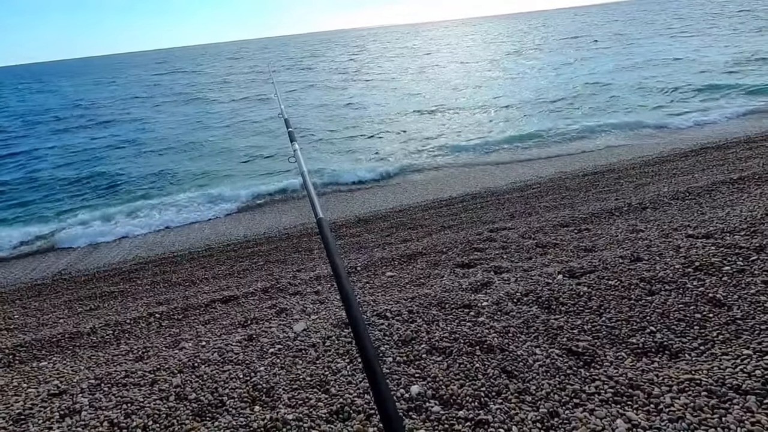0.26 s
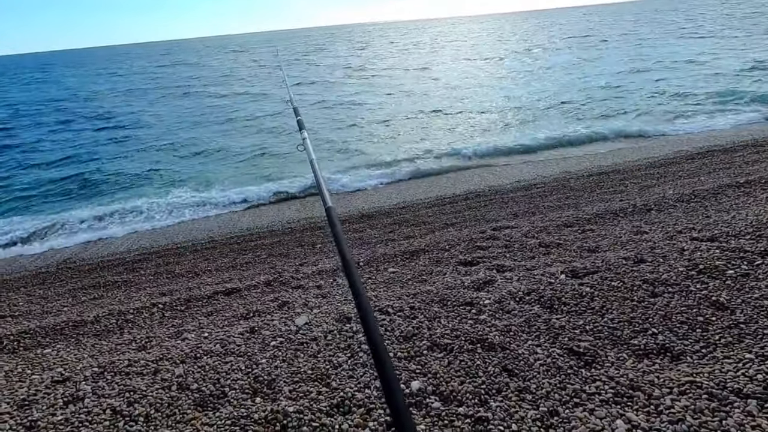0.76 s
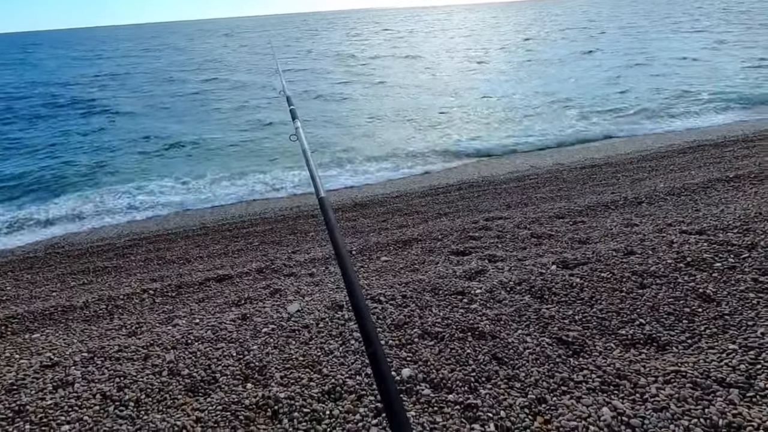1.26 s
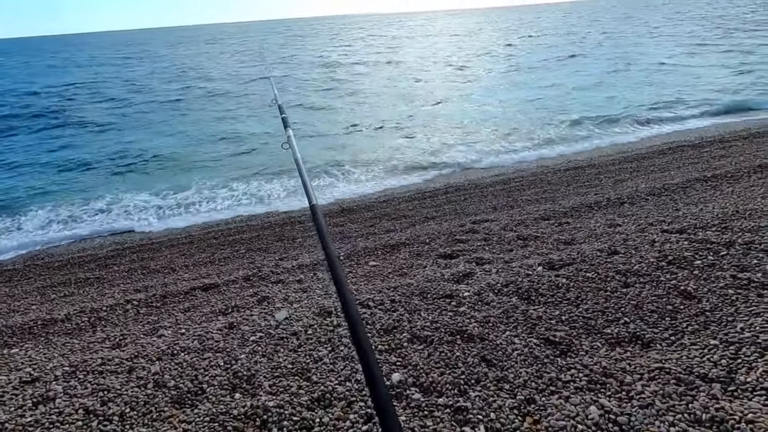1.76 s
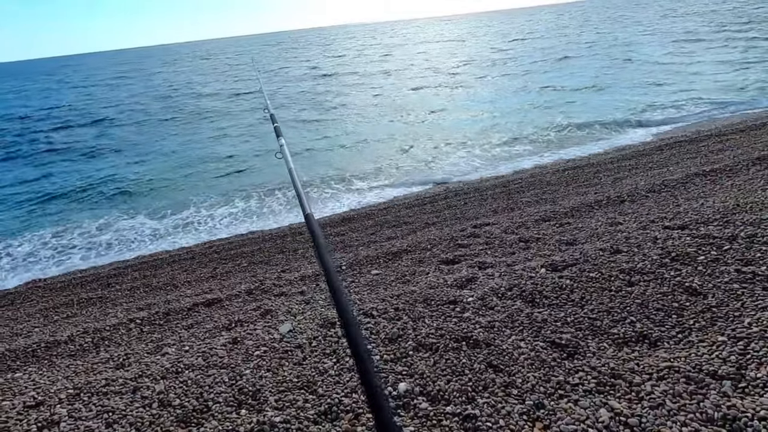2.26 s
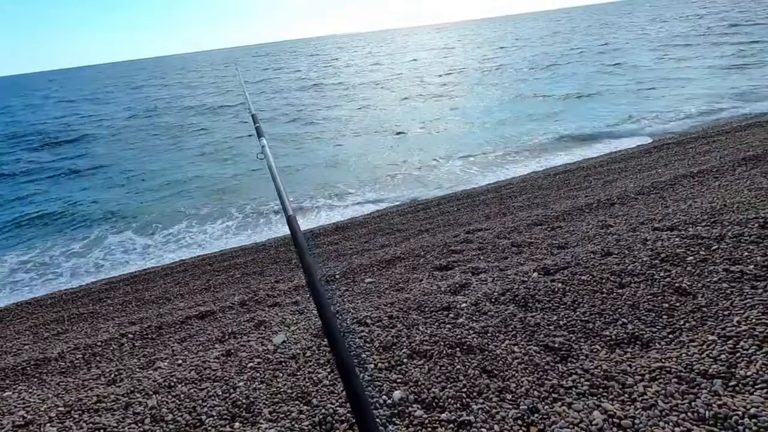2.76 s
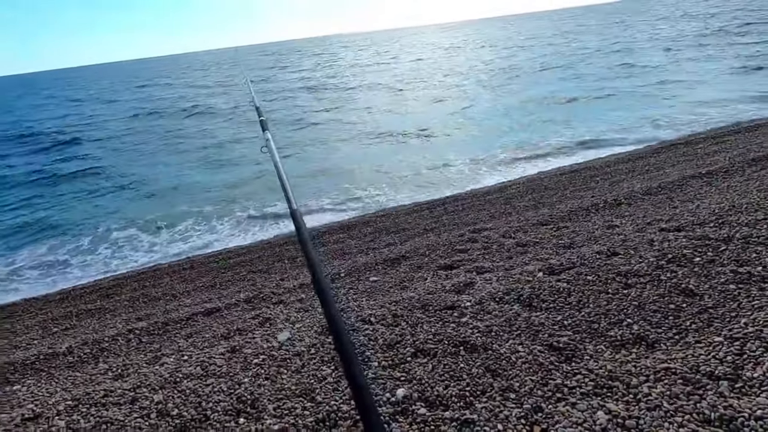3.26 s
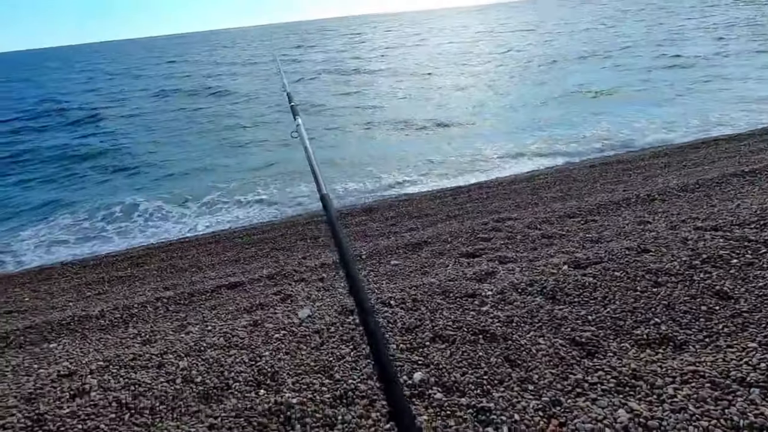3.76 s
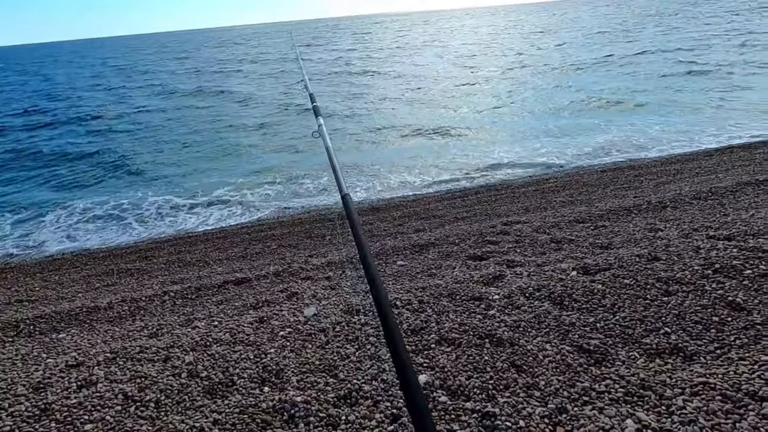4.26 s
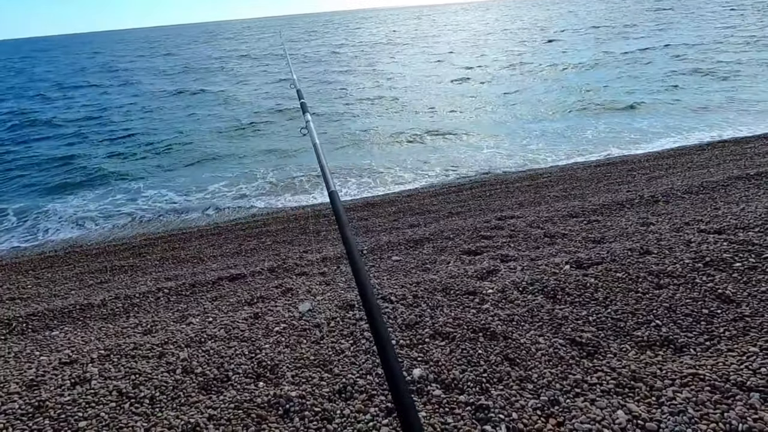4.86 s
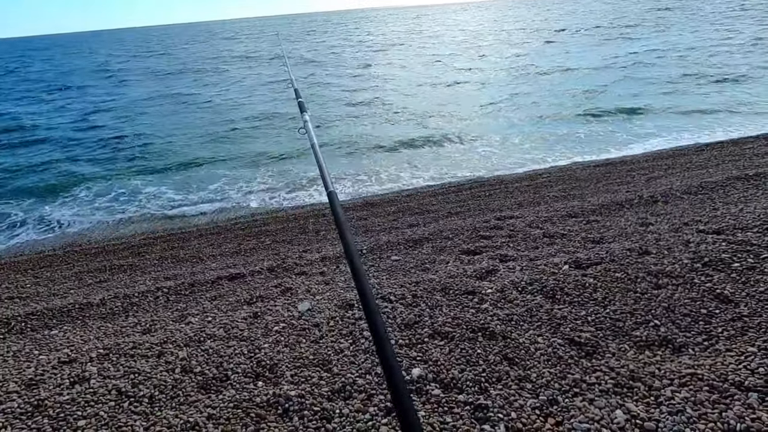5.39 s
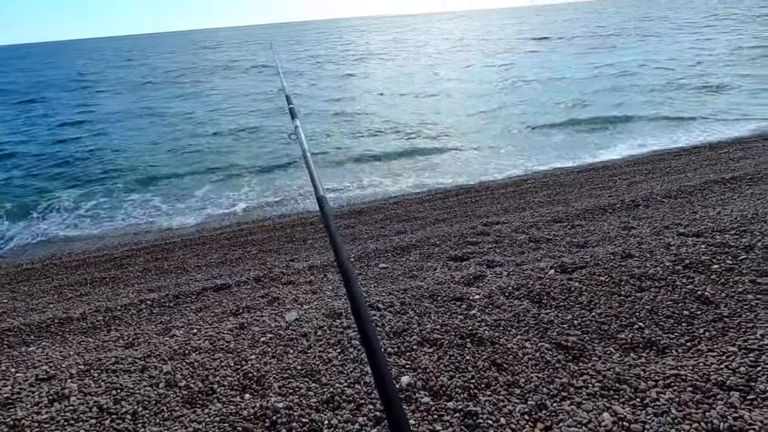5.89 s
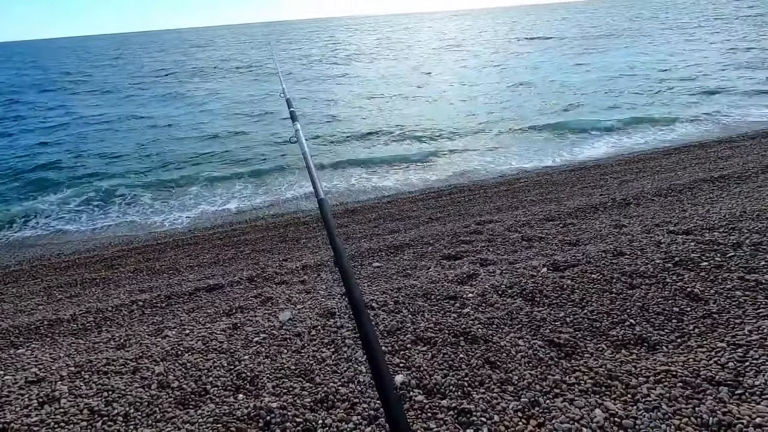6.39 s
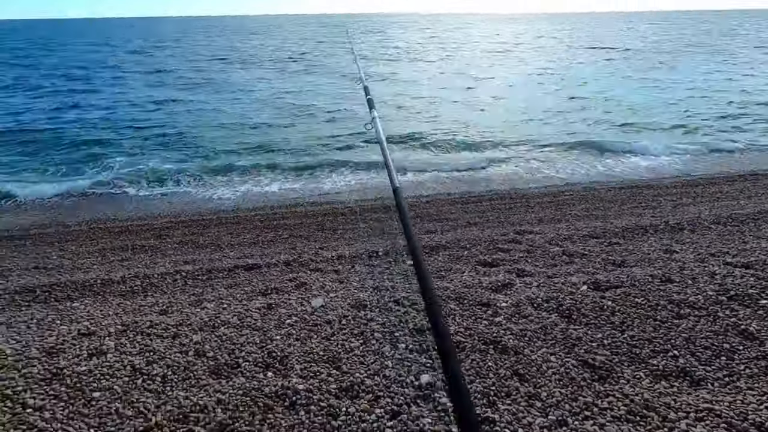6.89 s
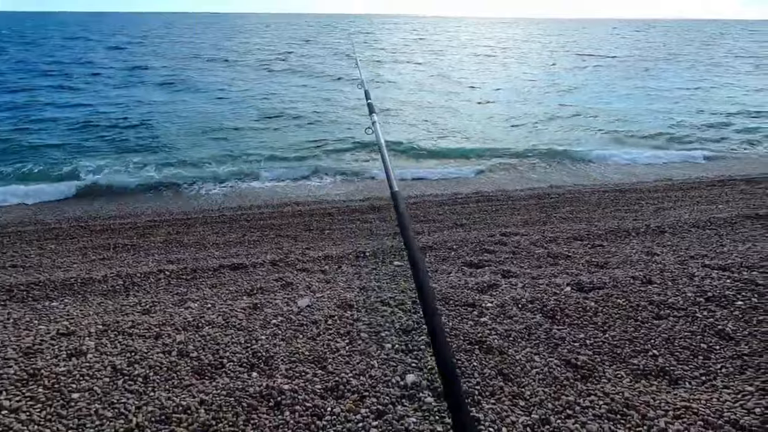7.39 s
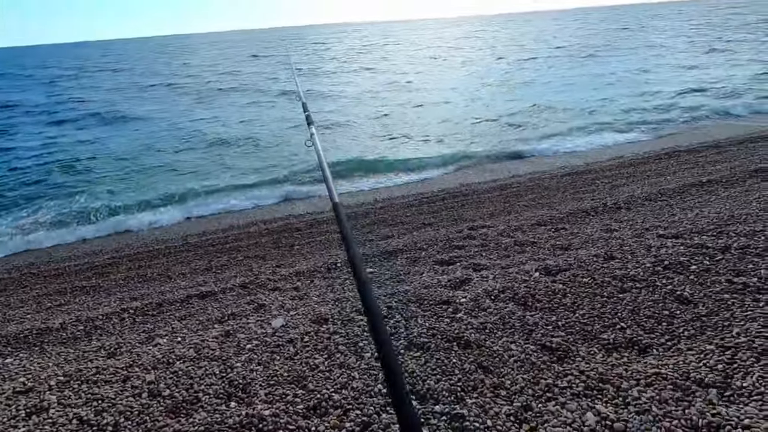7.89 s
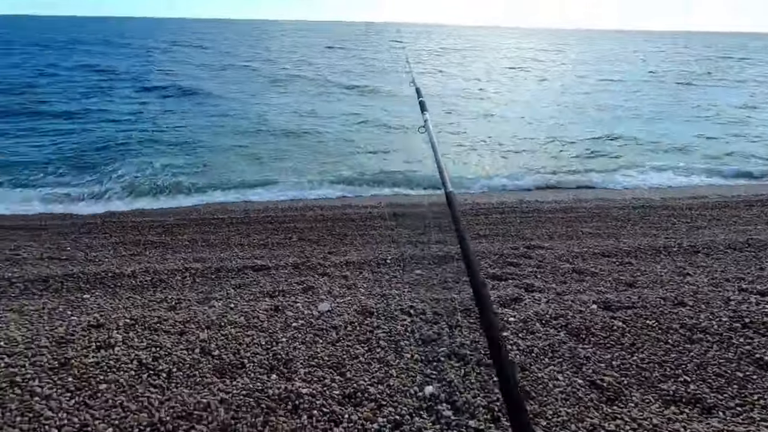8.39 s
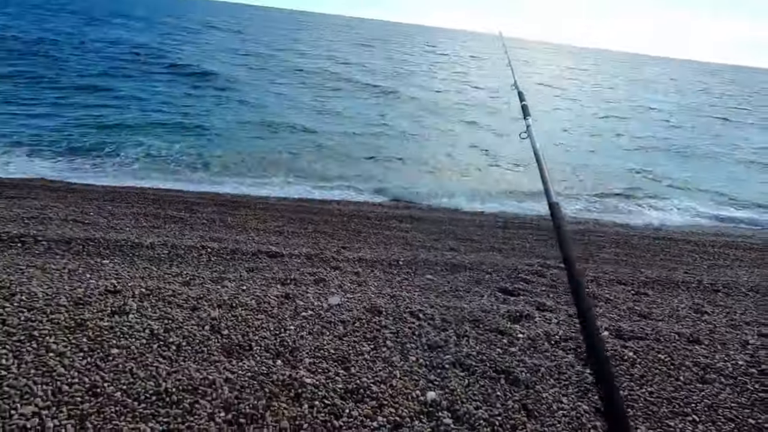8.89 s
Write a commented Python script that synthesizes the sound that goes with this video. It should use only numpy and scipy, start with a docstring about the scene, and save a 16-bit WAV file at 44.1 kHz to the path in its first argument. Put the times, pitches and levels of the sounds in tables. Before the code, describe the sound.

A windy pebble beach heard from a few metres up the bank. From 0 to about 1.8 s a small wave breaks, a smooth low roar under seething foam, bright fizz and dense clattering stones, with a fresh surge near 1.2 s. It thins by 2 s into a quieter wash until about 4.2 s. In this lull single pebbles tick nearby, with small scrapes of grit around 2.6, 3.3 and 3.6 s and the sharpest click near 3.8 s; fainter ticks continue to 5.4 s. From 4.3 s foam and dragged shingle grow, rattling strongly around 5.5 s and staying gravelly through 7 s. Another wave builds, breaking fullest near 8.2 s, then the stones ease until the end at 9.1 s. Low wind rumble and flutter buffet the microphone throughout, with thumping puffs around 1.4, 2.4 and 4.6 to 4.9 s, and abrupt strong ones at the very end.

```python
"""Small waves on a pebble beach, heard from a few metres up the bank on a windy day.
Breakers roar and foam seethes in filtered noise; the backwash drags stones that clatter as dense random impacts.
Nearer stones clink as short resonances, spray and mist fizz on top, and pebbles nearby tick or slide.
Wind buffets the microphone port with low noise that gusts hurry along, with flutter and sharp puffs."""
import sys
import numpy as np
from scipy import signal
from scipy.fft import rfft, irfft, next_fast_len
from scipy.io import wavfile
from scipy.ndimage import uniform_filter1d, map_coordinates

SR = 44100
rng = np.random.default_rng(int(sys.argv[2]) if len(sys.argv) > 2 else 0)


def materialize(psi):
    """Save the field psi as 16-bit PCM at rate SR to the path in sys.argv[1].

    A 1-D psi becomes a single channel; in a 2-D psi each row is a channel.
    """
    bounded = np.clip(np.atleast_2d(psi).T, -1, 1)
    quanta = np.round(bounded * 32767).astype(np.int16)
    wavfile.write(sys.argv[1], SR, quanta)


N = 403074   # length in samples

# Layer levels in the tables hold ahead of the echo and record(); colours give only the shape of a spectrum.


def sea():
    """Mixes the wash: one surge of water moves stones of every size; the large stones are the steadiest."""
    # waves breaking and running up: t/s, breaker level/dB, foam level/dB, mist level/dB
    surf = [(0.0, -33, -30, -63), (.6, -31.5, -29.5, -59.5), (1.07, -33, -33, -65),
            (1.2, -28.5, -29.5, -59.5), (1.55, -32.5, -28.5, -62), (1.88, -33.5, -31, -68),
            (2.15, -36, -36, -69), (2.65, -40.5, -40.5, -73), (2.95, -36, -36, -71),
            (3.35, -37.5, -36.5, -70), (3.66, -42.5, -40.5, -71), (3.95, -38, -37, -71),
            (4.35, -41.5, -33.5, -72), (4.9, -43.5, -30.5, -69.5), (5.5, -38, -33, -69),
            (6.2, -39.5, -44, -71), (6.5, -40, -37, -68), (6.85, -35, -31, -65.5),
            (7.75, -33.5, -30, -61.5), (8.24, -29.5, -29.5, -60.5), (9.14, -32, -33.5, -66)]
    # water drawing back through the shingle: t/s, dragged stones level/dB,
    # then gravel, grit and spray, each level/dB above the stones
    backwash = [(0.0, -28, -5, -12.5, -27), (.3, -28, -7, -11.5, -28), (1.0, -34, -7, -11.5, -29),
                (1.2, -31.5, -9, -11, -27), (1.85, -34, -6.5, -12.5, -26.5), (2.1, -40.5, -3, -8.5, -20.5),
                (3.0, -38.5, -8, -19, -21.5), (3.5, -40.5, -4, -10.5, -21.5), (4.0, -40, -4.5, -9.5, -23),
                (4.25, -37, -7.5, -13.5, -26), (4.45, -34.5, -8, -12, -28), (4.6, -34.5, -8.5, -7.5, -27),
                (4.9, -31, -6, -11.5, -25.5), (5.46, -27, -7.5, -14, -26.5), (6.1, -30.5, -3, -12, -20),
                (6.45, -29, -4, -12, -20.5), (6.8, -30, -3, -14, -19), (7.4, -28, -6.5, -14.5, -25),
                (8.1, -29, -6.5, -15, -26), (8.8, -36, -8.5, -12.5, -26), (9.14, -36, -8.5, -13.5, -21)]
    # passing bands of fizz: peak t/s, length/s, level/dB, centre f/Hz, half-width/octaves
    fizz = [(.25, 0.62, -43, 1950, 0.13), (.2, .5, -47, 3560, .35), (3.22, 0.99, -46, 1480, 0.38),
            (5.97, 1.9, -44, 4170, 0.098), (7.8, 1.1, -43.5, 2000, 0.094)]
    clink_db = -11   # above the dragged stones

    breaker_db, foam_db, mist_db = in_time(surf)
    stones_db, *above_db = in_time(backwash)
    gravel_db, grit_db, spray_db = stones_db + np.array(above_db)

    clatter = grains(per_s=2000, spread_db=3.5, blur=3.1)
    droplets = grains(per_s=1300, spread_db=3.5, blur=3.4)
    surge, splash = drift(3.7), drift(24)

    run_up = from_db(breaker_db) * breaker() + from_db(foam_db) * foam()
    run_up += from_db(mist_db) * mist(droplets, surge, splash)
    drag = from_db(stones_db) * stones(clatter, surge, splash)
    drag += from_db(stones_db + clink_db) * clinks()
    drag += from_db(gravel_db) * gravel(surge, splash)
    drag += from_db(grit_db) * grit(clatter, surge, splash)
    drag += from_db(spray_db) * spray(droplets, surge, splash)
    return run_up + drag + swells(fizz, clatter)


def breaker():
    """The far roar of breaking water: smooth low noise that hardly wavers."""
    # f/Hz, level/dB per Hz
    breaker_colour = [(150, -10), (250, 1), (400, 3.5), (560, 1), (800, -5), (1600, -57), (2050, -21),
                      (2300, -40), (3000, -28)]
    roar = rng.standard_normal(N) * from_db(0.29 * drift(9.5))
    return rms_one(colour(roar, breaker_colour))


def foam():
    """Bursting bubbles; smaller ones shift the whole band up."""
    # at a pitch of 1000 Hz: f/Hz, level/dB per Hz
    foam_colour = [(450, -13.5), (700, -3), (850, 0.5), (1000, 0.5), (1250, -3), (1700, -11), (3000, -39)]
    # pitch of the foam: t/s, f/Hz
    foam_pitch = [(0, 1150), (.6, 1200), (1.1, 976), (1.9, 954), (2.6, 994), (3.2, 940), (3.7, 990),
                  (4.3, 1115), (4.9, 1310), (5.5, 1275), (6.2, 1250), (6.85, 1120), (7.5, 1150),
                  (8.2, 1094), (9.14, 1030)]
    seethe = colour(grains(per_s=1200, spread_db=3.0, blur=1.72), foam_colour)
    pitch_hz, = in_time(foam_pitch)
    return carried(seethe, pitch_hz / 1000)


def stones(clatter, surge, splash):
    """Dragged stones clatter densely, swelling a little with the water."""
    # f/Hz, level/dB per Hz
    stone_colour = [(800, -18), (1300, 0), (1650, 0), (2080, 2), (2250, -2.5), (2800, -3.5), (3300, -8),
                    (4500, -27)]
    return rms_one(colour(clatter * from_db(0.17 * surge + 0.12 * splash), stone_colour))


def clinks():
    """Nearer stones knock together; each knock rings briefly at one of 24 pitches."""
    clinks_per_s, ring_cycles = 500, 33   # a ring falls by 60 dB in this many cycles
    knocks = grains(per_s=clinks_per_s, spread_db=3.0, blur=1e-9)
    dealt = rng.integers(0, 24, N)   # which pitch a knock excites
    ringing = 0
    for k, hz in enumerate(np.geomspace(900, 4300, num=24)):
        r = from_db(-60 * hz / (ring_cycles * SR))
        w = 2 * np.pi * hz / SR
        struck = knocks * (dealt == k) + 1e-18
        ringing = ringing + signal.lfilter([0, np.sin(w)], [1, -2 * r * np.cos(w), r * r], struck)
    # distance dulls the contact
    dull = signal.butter(3, 4400, fs=SR, output="sos")
    return rms_one(signal.sosfilt(dull, ringing))


def gravel(surge, splash):
    """Smaller stones rattle, at a pitch that shifts with time."""
    # at a pitch of 3800 Hz: f/Hz, level/dB per Hz
    gravel_colour = [(2200, 0.5), (3200, 0), (3900, 0.5), (4400, -2), (5000, -10), (6500, -25)]
    # pitch of the rattle: t/s, f/Hz
    gravel_pitch = [(0, 3800), (2.0, 3797), (3.5, 3800), (4.5, 3903), (5.5, 3852), (6.5, 3751), (7.5, 3550),
                    (8.5, 3601), (9.14, 3708)]
    impacts = grains(per_s=1800, spread_db=4.0, blur=2.1)
    rattle = colour(impacts * from_db(0.5 * surge + 0.5 * splash), gravel_colour)
    pitch_hz, = in_time(gravel_pitch)
    return carried(rattle, pitch_hz / 3800)


def grit(clatter, surge, splash):
    """The finest stones hiss under the same impacts as the dragged stones, less evenly."""
    # f/Hz, level/dB per Hz
    grit_colour = [(3500, -8.5), (4900, 1.5), (6000, -3), (6800, -8), (7300, -13.5), (9000, -47)]
    return rms_one(colour(clatter * from_db(0.31 * surge + 0.6 * splash), grit_colour))


def spray(droplets, surge, splash):
    """Falling droplets fizz as dense tiny impacts."""
    # f/Hz, level/dB per Hz
    spray_colour = [(5500, -3), (7200, -2), (8700, -8.5), (9500, -17), (12000, -50)]
    return rms_one(colour(droplets * from_db(0.31 * surge + 0.45 * splash), spray_colour))


def mist(droplets, surge, splash):
    """The same droplets in the highest band, with an extra flicker of level."""
    # f/Hz, level/dB per Hz
    mist_colour = [(7500, -11.5), (9600, -4.5), (11200, -7), (11900, -13.5), (13300, -17), (14500, -26),
                   (16000, -34)]
    flicker_db = .4 * surge + 0.77 * splash + .5 * drift(12)
    return rms_one(colour(droplets * from_db(flicker_db), mist_colour))


def bank(x):
    """A short echo off the slope of stones hollows the sound."""
    # echo, shifting as the microphone turns: t/s, share of the direct sound, delay/ms
    echo = [(0, 0.16, 1.04), (1.0, 0.13, 0.99), (1.2, .27, 1.06), (1.9, 0.13, 0.96), (2.3, 0.11, 0.95),
            (3.2, .05, 1.01), (4.5, .04, 1.02), (6.0, 0.042, 1.14), (7.0, .04, 1.0), (8.0, .13, 0.96),
            (9.14, 0.099, 0.97)]
    # loose stones dull the echo: f/Hz, level/dB
    bank_colour = [(10, 0), (3000, -1), (5000, -11), (9000, -16), (22000, -30)]
    share, delay_ms = in_time(echo)
    late = map_coordinates(colour(x, bank_colour), [np.arange(N) - delay_ms * SR / 1000], order=3)
    return (x + share * late) / np.sqrt(1 + share ** 2)


def pebbles():
    """Ticks are single hard clicks; slides are bursts of grit that start suddenly and trail off."""
    # single pebbles knocking: t/s, click level/dB ahead of its colour
    ticks = [(2.5755, -35), (2.5865, -34), (2.9955, -35), (3.1855, -31), (3.5875, -34), (3.7638, -22),
             (3.9855, -34), (4.1325, -31), (4.3205, -34), (4.5385, -35), (4.846, -35), (5.403, -31)]
    # f/Hz, level/dB
    tick_colour = [(3000, -20), (7000, 4), (9500, 3), (13000, -14), (16000, -30)]
    # short slides of grit: peak t/s, length/s, level/dB, centre f/Hz, half-width/octaves
    slides = [(2.583, 0.021, -45, 5000, .5), (2.985, 0.029, -57, 7000, 0.37), (3.33, 0.16, -59, 8700, 0.22),
              (3.345, 0.12, -45, 4480, 0.27), (3.583, 0.06, -38.5, 4160, 0.42),
              (3.582, .05, -58, 8800, 0.31)]
    clicks = np.zeros(N)
    for s, strength_db in ticks:
        clicks[round(s * SR)] = from_db(strength_db)
    scrape = grains(per_s=900, spread_db=1.5, blur=0.83)
    return colour(clicks, tick_colour) + swells(slides, scrape, rise=.12)


def wind():
    """Eddies sweep the port; their swings stay rather even; gusts hurry them along and add a flutter."""
    # wind on the port: t/s, buffeting level/dB, flutter level/dB above the buffeting
    wind_course = [(0.0, -28.5, -2), (.5, -23, -14.5), (.8, -22, -8.5), (1.12, -24.5, -4.5),
                   (1.3, -20.5, -12), (1.8, -20, -12), (2.25, -21.5, -9), (2.46, -21, -3), (2.7, -21, -8.5),
                   (2.9, -25.5, -9.5), (3.1, -20, -12), (3.45, -21, -9), (3.75, -21.5, -19),
                   (3.95, -20, -3), (4.15, -22.5, -7), (4.3, -21, -9.5), (4.8, -23, -3.5),
                   (5.2, -20.5, -12), (5.65, -23, -4), (6.1, -20, -13.5), (6.42, -24, -16),
                   (6.7, -21.5, -9), (7.05, -21.5, -13.5), (7.4, -22, -10), (7.8, -20.5, -12),
                   (8.2, -22.5, -9), (8.55, -20.5, -6), (8.85, -22.5, -5.5), (9.0, -21.5, -8.5),
                   (9.07, -19.5, -6.5), (9.14, -20, -9)]
    # f/Hz, level/dB per Hz
    buffet_colour = [(8, -34), (20, -5.5), (45, -1.5), (75, -3.5), (110, -11), (170, -23), (300, -29.5)]
    # f/Hz, level/dB per Hz
    flutter_colour = [(65, -17), (110, -0.5), (160, -7.5), (200, -12.5), (280, -21.5), (600, -50)]
    # sharp puffs within the gusts: peak t/s, length/s, level/dB, centre f/Hz, half-width/octaves
    puffs = [(1.38, 0.046, -26, 180, .5), (1.965, .037, -28, 200, 0.61), (2.37, .09, -24, 151, .45),
             (2.425, 0.066, -21, 200, 0.84), (2.49, .06, -28, 160, 0.52), (2.645, .034, -29, 195, .4),
             (3.97, .06, -29.5, 200, .75), (4.6, 0.13, -29, 175.3, 0.45), (4.88, 0.13, -27.5, 179, .4),
             (5.66, .06, -35, 180, .4), (8.68, .054, -27, 180, 0.48), (9.087, 0.02, -16.5, 240, 1.1),
             (9.128, 0.017, -15, 211, 0.85)]
    # f/Hz, level/dB per Hz
    puff_colour = [(40, 2), (150, -2.5), (300, -15), (900, -28)]

    buffet_db, flutter_db = in_time(wind_course)
    gust = drift(5)
    eddies = carried(colour(rng.standard_normal(N), buffet_colour), from_db(1.1 * gust))
    # partly level the swings, followed over 2600 samples
    swing = np.sqrt(uniform_filter1d(eddies ** 2, size=2600) + .05)
    eddies = rms_one(eddies / swing ** 0.39)

    uneven = rng.standard_normal(N) * from_db(0.77 * gust + 2.35 * drift(9.1))
    flutter = rms_one(colour(uneven, flutter_colour))
    buffeting = from_db(buffet_db) * (eddies + from_db(flutter_db) * flutter)
    return buffeting + swells(puffs, colour(rng.standard_normal(N), puff_colour))


def grains(per_s, spread_db, blur):
    """Random impacts of uneven size over a blur of countless far ones."""
    sizes = from_db(spread_db * np.minimum(rng.exponential(1, N), 5))
    signed = sizes * rng.choice([-1, 1], N)
    near = signed * (rng.random(N) < per_s / SR)
    return rms_one(near) + blur * rng.standard_normal(N)


def swells(rows, noise, rise=0.54):
    """Bands of noise under bell envelopes; rise is the width of the front as a share of the length."""
    t, out = np.arange(N) / SR, np.zeros(N)
    for s, length, level_db, centre_hz, octaves in rows:
        start = max(round((s - 3 * length) * SR), 0)
        end = min(round((s + 2 * length) * SR), N)
        near = slice(start, end)
        edges = np.minimum(centre_hz * 2 ** (octaves * np.array([-1, 1])), .3 * SR)
        band = signal.sosfilt(signal.butter(4, edges, "band", fs=SR, output="sos"), noise[near])
        width = length * np.where(t[near] < s, rise, 1 - rise)
        bell = np.exp(-2 * ((t[near] - s) / width) ** 2)
        out[near] += from_db(level_db) * rms_one(band * bell) * np.sqrt(np.mean(bell ** 2))
    return out


def carried(x, speed):
    """Reads a signal faster or slower, which shifts its whole spectrum, and sets unit power."""
    return rms_one(map_coordinates(x, [np.cumsum(speed)], order=3, mode="mirror"))


def colour(x, spectrum):
    """Gives a flat signal the spectrum, drawn straight on a log-frequency axis."""
    size = next_fast_len(N)
    hz, level_db = np.transpose(spectrum)
    f = np.maximum(np.arange(size // 2 + 1) * SR / size, 1)
    gain = from_db(np.interp(np.log(f), np.log(hz), level_db, -120, -120))
    return irfft(rfft(x, size) * gain, size)[:N]


def drift(rate_hz):
    """Slow chance with spread 1: noise at every 40th sample through a double one-pole low-pass."""
    r = np.exp(-80 * np.pi * rate_hz / SR)
    chance = rng.standard_normal(N // 40 + 2002)
    slow = signal.lfilter([1], [1, -2 * r, r * r], chance)[2000:]   # drop the settling
    return np.interp(np.arange(N) / 40, np.arange(len(slow)), rms_one(slow))


def in_time(rows):
    """The columns of a curve table, one value a sample."""
    s, *columns = np.transpose(rows)
    return [np.interp(np.arange(N) / SR, s, c) for c in columns]


def from_db(db):
    """Decibels to gain."""
    return 10 ** (np.asarray(db) / 20)


def rms_one(x):
    """Scales to unit power."""
    return x / np.sqrt(np.mean(x ** 2) + 1e-20)


def scene():
    """Sea and pebbles arrive through the air; the wind acts on the port itself."""
    return (bank(sea()) + pebbles() + wind())[None]


def record(dry):
    """Peaks are rounded a little, the top is cut."""
    rounded = 1.503 * np.tanh(dry / 1.387)
    # 50 dB down from 14900 Hz
    top_cut = signal.cheby2(14, 50, 14900, fs=SR, output="sos")
    return signal.sosfilt(top_cut, rounded)


dry = scene()
out = record(dry)
materialize(out)
```